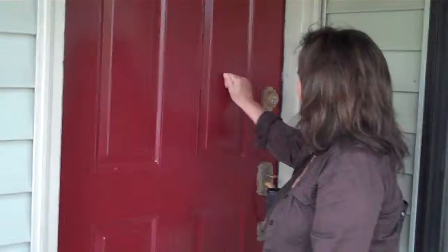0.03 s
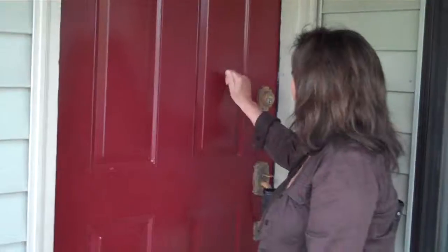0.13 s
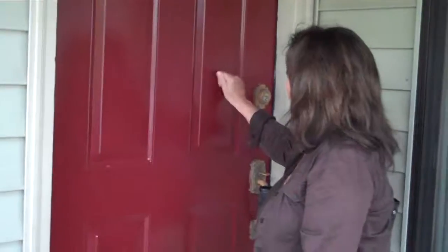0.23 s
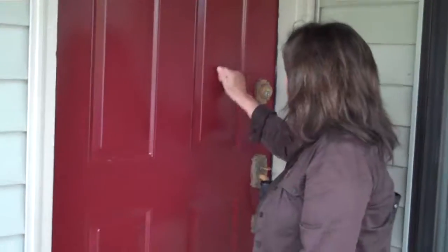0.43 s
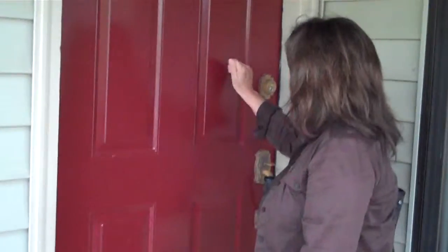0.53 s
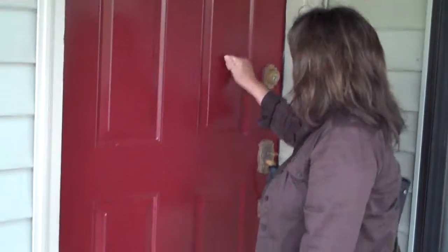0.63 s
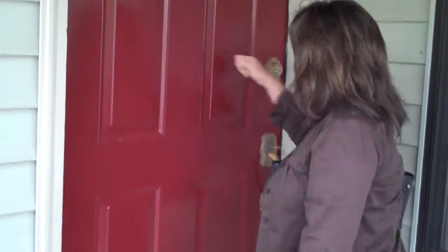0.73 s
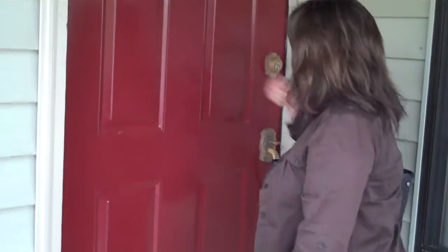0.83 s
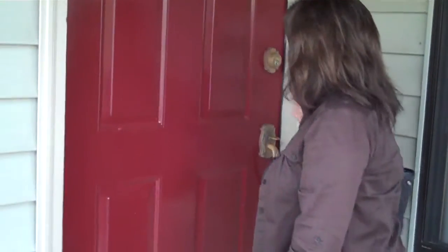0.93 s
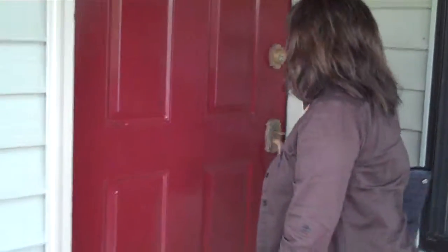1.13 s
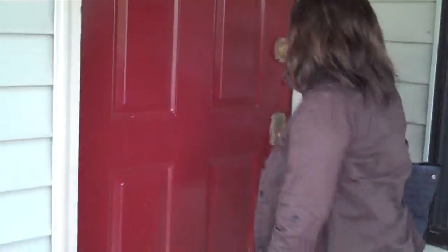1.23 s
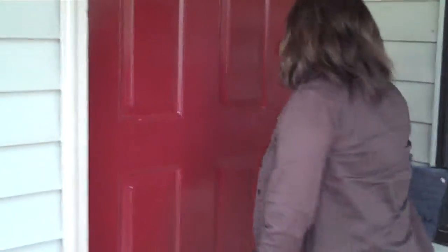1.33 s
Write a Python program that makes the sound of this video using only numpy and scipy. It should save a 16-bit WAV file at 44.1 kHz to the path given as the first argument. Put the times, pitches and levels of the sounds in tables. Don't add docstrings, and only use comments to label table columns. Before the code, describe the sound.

Four quick knuckle raps on a wooden front door, heard from a few steps away outside

```python
import sys
import numpy as np
from scipy import signal
from scipy.io import wavfile
from scipy.ndimage import uniform_filter1d

SR = 44100
rng = np.random.default_rng(int(sys.argv[2]) if len(sys.argv) > 2 else 0)


def log_audio(samples):
    frames = np.atleast_2d(samples).T
    limited = np.clip(frames, -1, 1)
    pcm = np.round(limited * 32767).astype(np.int16)
    wavfile.write(sys.argv[1], SR, pcm)


def makeup_ratio(level_db):
    decades = np.asarray(level_db, float) / 20
    return 10 ** decades


N = 61739
T = np.arange(N) / SR

# start_s [s], level_db [dB], contact_ms [ms], low_panel_db [dB], latch_buzz_db [dB]
KNOCKS = [
    (0.0524, -31.5, 0.26, 5, -43),
    (0.2315, -36, 0.28, -7, -52),
    (.417, -36, 0.33, -5, -51.5),
    (0.6117, -34.5, 0.34, -5, -51.5),
]


def evened(x):
    return x / np.sqrt(np.mean(x ** 2) + 1e-20)


def read(points, hz):
    f, value = np.transpose(points)
    return np.interp(np.log(hz + 1), np.log(f + 1), value)


def curve(rows, col):
    rows = np.array(rows)
    return np.interp(T, rows[:, 0], rows[:, col])


def add(mix, s, sound):
    part = mix[round(s * SR):][:len(sound)]
    part += sound[:len(part)]


def resonate(x, hz, width):
    turn = np.exp(2j * np.pi * np.cumsum(hz * np.ones(len(x))) / SR)
    r = np.exp(-np.pi * width / SR)
    smooth = signal.lfilter([1 - r], [1, -r], x / turn + 1e-18)
    return 2 * (turn * smooth).real


def hiss(colour, patchy_db, size):
    a, b, patches = rng.standard_normal((size // 256 + 5, 513, 3)).T
    patches = uniform_filter1d(patches, size=16, axis=0)
    patches = evened(uniform_filter1d(patches, size=8, axis=1))
    colour_db = read(colour, np.fft.rfftfreq(1024, 1 / SR))[:, None]
    z = (a + 1j * b) * makeup_ratio(colour_db + patchy_db * patches)
    return evened(signal.istft(z, nperseg=1024, noverlap=768)[1][:size])


def outdoor_wash():
    # pitch_hz [Hz], level_db [dB per Hz]
    wash_colour = [(20, -8), (80, -8), (300, -4.5), (650, -2), (1200, 0.5), (2400, -10.5), (4000, -17.5),
                   (13700, -32.5)]
    return makeup_ratio(-61) * hiss(wash_colour, 1, size=N)


def jacket_rustle():
    # time_s [s], level_db [dB]
    movement = [(.04, -87), (.3, -71.5), (.7, -91), (.8, -76.5), (.97, -64.5), (1.03, -74), (1.07, -65.5),
                (1.2, -64.5), (1.27, -66), (1.36, -62), (1.4, -57.5)]
    # pitch_hz [Hz], level_db [dB per Hz]
    cloth_colour = [(300, -35), (700, -8.5), (2000, -9), (3500, -1), (7000, -8), (13700, -11.5)]
    return makeup_ratio(curve(movement, 1)) * hiss(cloth_colour, 2.1, size=N)


def porch():
    # delay_s [s], level_db [dB]
    bounces = [(.0058, -10), (.0113, -11), (.019, -11.5), (.031, -14)]
    # pitch_hz [Hz], t60_s [s]
    tail_decay = [(150, 0.37), (500, 0.16), (1500, 0.23), (4000, 0.11)]
    tail_db = -10
    taps = np.zeros(SR // 2)
    at = np.arange(120, SR // 2 - 20, 20)
    taps[at + rng.integers(0, 20, len(at))] = rng.choice([-1., 1.], len(at))
    hz, t, z = signal.stft(taps, SR, nperseg=256)
    fade = makeup_ratio(-60 * t / read(tail_decay, hz)[:, None])
    tail = signal.istft(z * fade, SR, nperseg=256)[1]
    tail *= makeup_ratio(tail_db) / np.linalg.norm(tail)
    direct = (0.0018, 0.036)
    for k, (s, db) in enumerate([direct] + list(bounces)):
        add(tail, s, makeup_ratio(db) * np.array([(-1.) ** k]))
    return tail


def door_ring(t, low_db):
    # pitch_hz [Hz], level_db [dB], t60_s [s]
    door_modes = [(222, -18.5, 0.097), (245, -4.5, 0.12), (332.7, -11, 0.1), (366.8, -8.5, .16),
                  (428.6, -9, 0.13), (498.3, 2, 0.14), (535, -2, 0.095), (613, -3, 0.083),
                  (677.8, -8.5, 0.14), (785.4, -4, 0.087), (863.6, -3, 0.066), (1014, -5, 0.092),
                  (1403.8, -6, 0.099), (1568, -3, 0.039)]
    # pitch_hz [Hz], level_db [dB per Hz]
    grain_colour = [(30, -20), (110, -32), (230, -7), (340, -1.5), (520, 3.5), (950, -6.5), (1500, -2.5),
                    (2100, -22.5), (3500, -37), (6000, -66)]
    swell_s, spot_db = 0.0019, 1.2
    grain_db, grain_t60_s = -8, 0.21
    clack_db, clack_peak_s = -1.5, 0.0052
    spot = rng.standard_normal(len(door_modes))
    ring = np.zeros(len(t))
    for w, (hz, mode_db, t60) in zip(spot, door_modes):
        low_panel_db = low_db * (300 < hz < 450)
        fade = makeup_ratio(mode_db + spot_db * w + low_panel_db - 60 * t / t60)
        ring -= fade * np.sin(2 * np.pi * hz * t)
    swell = np.exp(-t / swell_s)
    ring *= 1 - 1.14 * swell
    ring += makeup_ratio(grain_db - 60 * t / grain_t60_s) * hiss(grain_colour, 0, size=len(t)) * (1 - swell)
    u = t / clack_peak_s
    clack = sum(np.sin(2 * np.pi * hz * t) for hz in (1328, 1413))
    return ring + makeup_ratio(clack_db) * (u * np.exp(1 - u)) ** 2 * clack


def latch_buzz(t, buzz_db):
    # pitch_hz [Hz], level_db [dB per Hz]
    buzz_colour = [(1000, -33), (1800, 6.5), (3300, -6), (6700, -17), (8000, -15), (13700, -22)]
    rise_s, t60_s = 0.0041, 0.23
    hold_s, hold_db = 0.033, -6.5
    loose = makeup_ratio(-60 * t / (t60_s / 2)) + makeup_ratio(hold_db) / (1 + (t / hold_s) ** 4)
    return makeup_ratio(buzz_db) * loose * (1 - np.exp(-t / rise_s)) * hiss(buzz_colour, 0.69, size=len(t))


def knock(room, db, contact_ms, low_db, buzz_db):
    ring_s = 0.4
    t = np.arange(round(ring_s * SR)) / SR
    ring = door_ring(t, low_db)
    push = np.sin(np.pi * np.clip(t[:100] / (contact_ms / 1000), 0, 1))
    body = signal.fftconvolve(ring, np.convolve(room, push))[:len(t)]
    return makeup_ratio(db) * body / np.std(body[:1300]) + latch_buzz(t, buzz_db)


def frame_hum():
    hum_hz, hum_db, t60_s, build_db = 156.1, -74.5, 1.68, 4.5
    since = T - np.array(KNOCKS)[:, :1]
    blow_number = np.arange(len(KNOCKS))[:, None]
    db = hum_db + build_db * blow_number - 60 * since / t60_s
    strength = np.sqrt((makeup_ratio(db) ** 2 * np.clip(since / 0.01, 0, 1)).sum(0))
    waver = evened(uniform_filter1d(rng.standard_normal(N), size=3000))
    phase = 2 * np.pi * np.cumsum(hum_hz + 3.2 * waver - 5 * T) / SR
    return strength * makeup_ratio(1.15 * waver) * np.sqrt(2) * np.sin(phase)


def tick(start, db, hz, tail_db, t60):
    peak_s, width_hz = 0.00013, 5500
    t = np.arange(6000) / SR
    u = t / peak_s
    click = u * np.exp(1 - u) * np.sin(2 * np.pi * hz * t)
    fizz = resonate(rng.standard_normal(6000), hz, width_hz)
    fizz = evened(resonate(fizz, hz, width_hz))
    return start, makeup_ratio(db) * (click + makeup_ratio(tail_db - 60 * t / t60) * fizz)


def sleeve_swish():
    # time_s [s], level_db [dB], pitch_hz [Hz]
    sleeve = [
        (.56, -80, 2530),
        (.59, -60.5, 2320),
        (.64, -63.5, 2100),
        (.72, -62, 1830),
        (.8, -62.5, 1740),
    ]
    return evened(resonate(rng.standard_normal(N), curve(sleeve, 2), 330)) * makeup_ratio(curve(sleeve, 1))


def far_drone():
    # time_s [s], level_db [dB]
    drone_level = [(.7, -78), (.8, -63), (.9, -64), (1.05, -74.5), (1.2, -72.5)]
    return evened(resonate(rng.standard_normal(N), 657, 22)) * makeup_ratio(curve(drone_level, 1))


def scuff():
    # time_s [s], level_db [dB], brightness_db [dB]
    drag = [(1.24, -63, 10), (1.28, -58, -10), (1.31, -51, -30), (1.335, -51.5, -7), (1.365, -48.5, 6.5),
            (1.38, -49, -11), (1.4, -60, -9)]
    # pitch_hz [Hz], width_hz [Hz], level_db [dB]
    boards = [(730, 46, -6), (1300, 220, -8.5), (1460, 56, -1.5), (1970, 90, 2.5), (2200, 75, -1.5),
              (1640, 710, 2), (2600, 550, 0), (4000, 2700, -12)]
    slips = rng.random(N) < 1500 / SR
    slip_db = 2. * np.minimum(rng.exponential(1, N), 3)
    grit = rng.standard_normal(N) * (1 + makeup_ratio(slip_db) * slips)
    bright = makeup_ratio(curve(drag, 2))
    total = np.zeros(N)
    for hz, width, db in boards:
        board = evened(resonate(resonate(grit, hz, width), hz, 3 * width))
        total += makeup_ratio(db) * board * (bright if hz > 2400 else 1)
    return makeup_ratio(curve(drag, 1) - 8) * total * (T > drag[0][0])


def scene():
    # start_s [s], level_db [dB], pitch_hz [Hz], tail_db [dB], tail_t60_s [s]
    fittings = [
        (.396, -62, 8800, -23, .03),
        (0.3997, -54, 10000, -18, 0.053),
        (.450, -45, 6200, -27, 0.04),
        (.4545, -38, 6100, -20, 0.23),
        (0.594, -55.5, 7100, -18, 0.027),
        (.657, -53, 6000, -14.5, 0.047),
        (.700, -60, 8660, -34, .03),
        (1.088, -50, 11000, -9, 0.047),
        (.28, -58.5, 4930, -5.5, 0.062),
    ]
    mix = outdoor_wash() + jacket_rustle() + frame_hum() + sleeve_swish() + far_drone() + scuff()
    room = porch()
    for row in KNOCKS:
        add(mix, row[0], knock(room, *row[1:]))
    for row in fittings:
        add(mix, *tick(*row))
    return mix[None]


def low_pass(x):
    return signal.sosfilt(signal.butter(12, 13840, fs=SR, output="sos"), x)


def record(dry):
    start_s, opening_s, offset = 0.0361, 0.00045, -0.0004
    gate = np.clip((T - start_s) / opening_s, 0, 1)
    treble_limit = signal.firwin(255, 13900, window=("kaiser", 8), fs=SR)
    heard = signal.oaconvolve((dry + offset) * gate, treble_limit[None], "same")
    return low_pass(heard)


dry = scene()
out = record(dry)
log_audio(out)
```